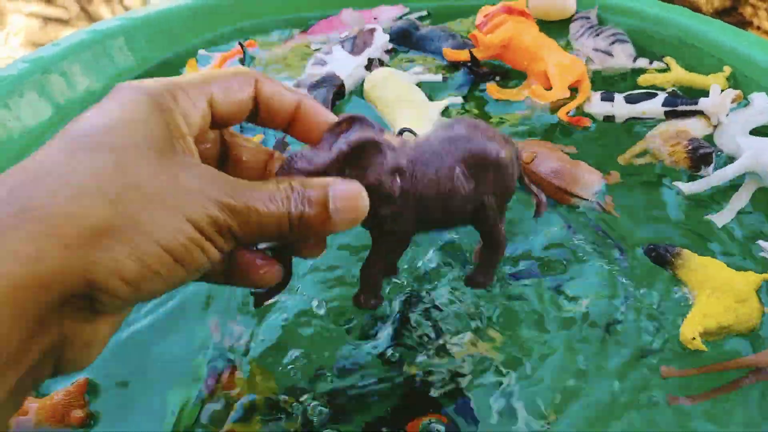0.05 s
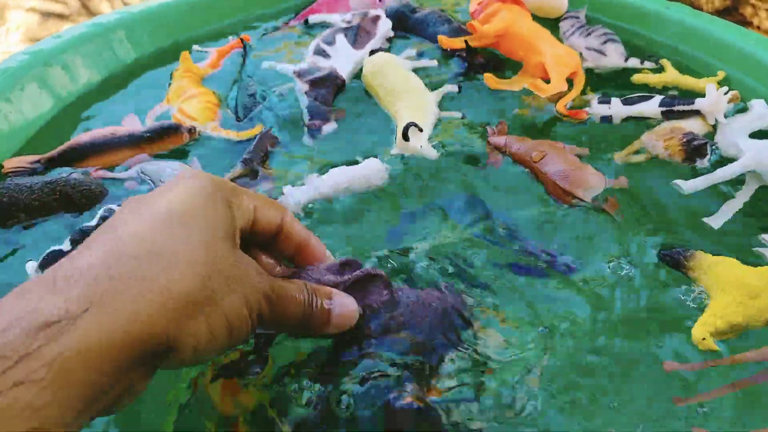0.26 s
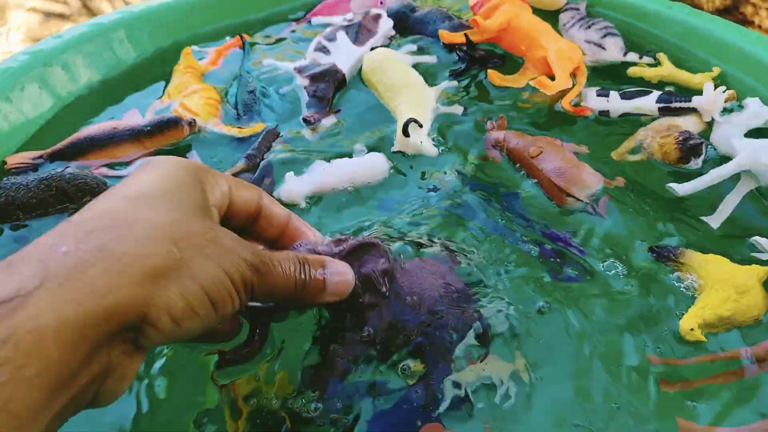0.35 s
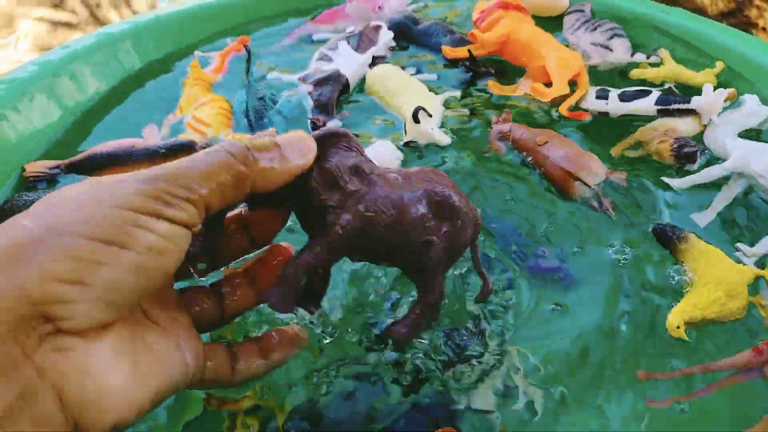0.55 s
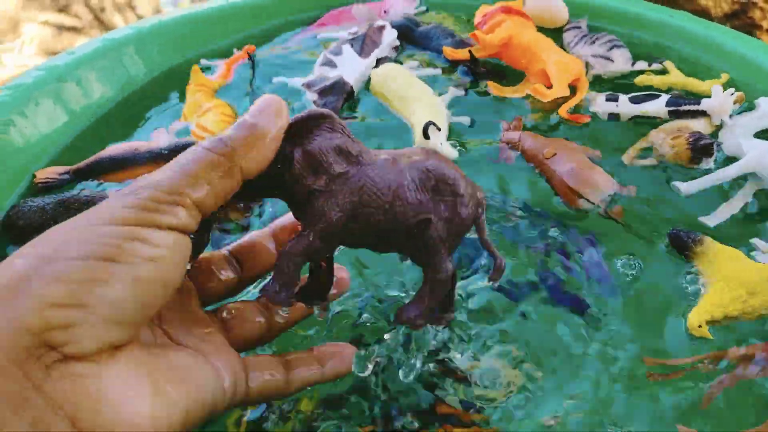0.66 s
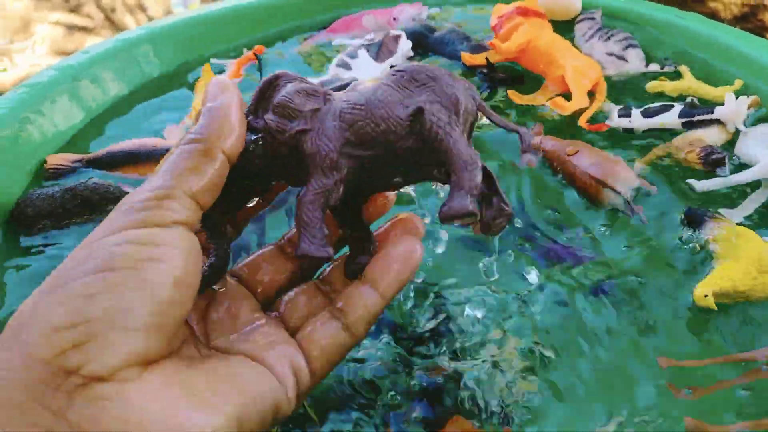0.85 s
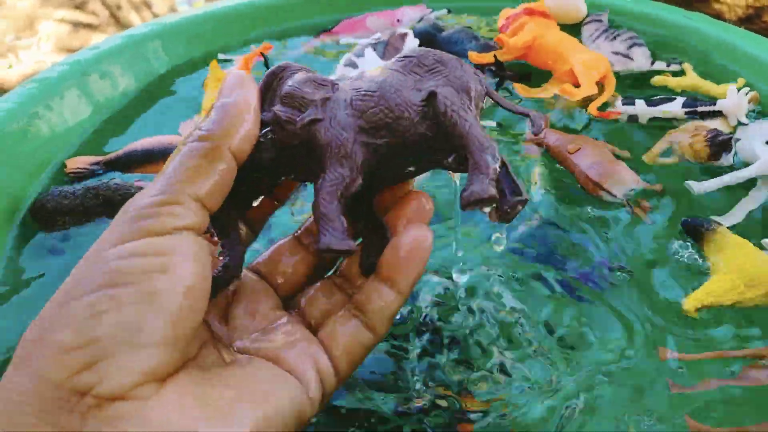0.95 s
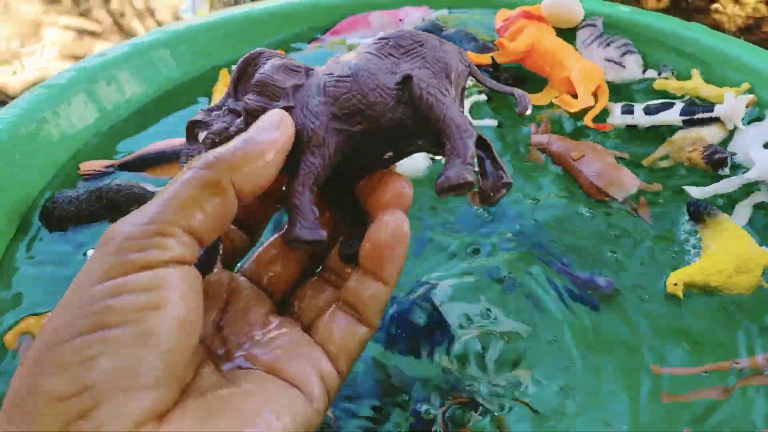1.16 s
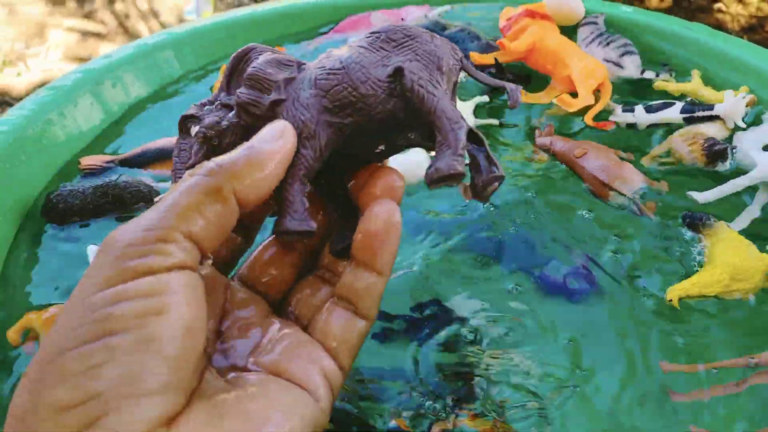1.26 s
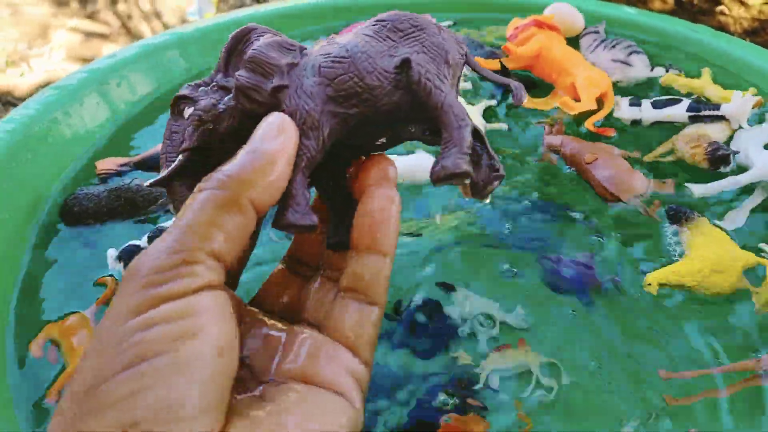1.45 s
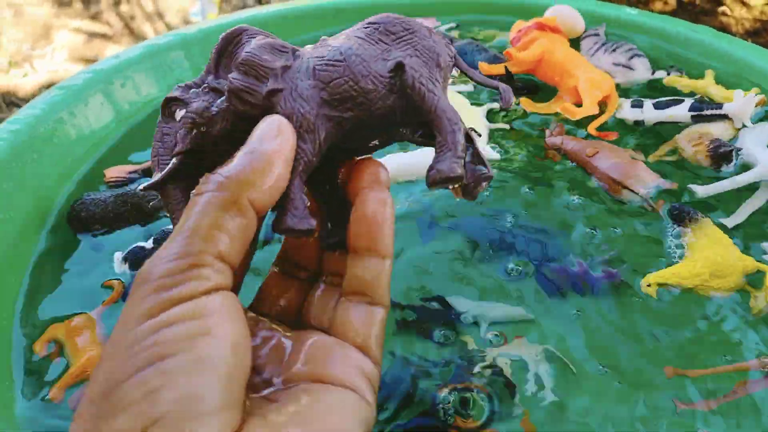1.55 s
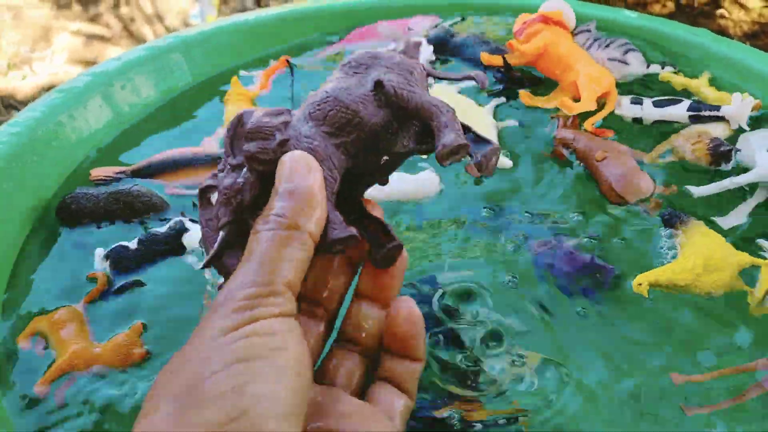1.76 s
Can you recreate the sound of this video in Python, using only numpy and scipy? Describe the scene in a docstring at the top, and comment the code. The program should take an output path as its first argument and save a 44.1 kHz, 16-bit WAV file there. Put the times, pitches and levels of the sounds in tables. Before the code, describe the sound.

A quick wet slap and bubbling splash, heard close and fairly dry, after a little trickling; then single drops tick and plink into the tub over very faint garden air and low hum.

```python
"""A plastic toy is dunked by hand in a shallow outdoor tub and lifted out, heard close: water slaps shut over it.
Slaps, film spits and mist are coloured noise bursts; bubbles, plinks and ticks are damped sines that slide in pitch.
Slosh and spray are dense random bubbles over hiss. The tub adds a short echo of decaying noise.
Behind: faint held tones, a wash of garden air (filtered noise) and a wavering low hum (sine)."""
import sys
import numpy as np
from scipy import signal
from scipy.fft import rfft, irfft, next_fast_len
from scipy.io import wavfile
from scipy.ndimage import map_coordinates

SR = 44100
rng = np.random.default_rng(int(sys.argv[2]) if len(sys.argv) > 2 else 0)


def field_ratio(decibels):
    """Amplitude ratio for a level in dB (20 dB per decade); scalars and array-likes work."""
    return 10 ** (np.asarray(decibels, dtype=float) / 20)


def master_out(mix):
    """Clip the mix to full scale and print it as 16-bit PCM to the path in sys.argv[1]."""
    frames = np.transpose(np.atleast_2d(mix))
    ceiling = np.clip(frames, -1, 1)
    pcm = np.round(ceiling * 32767).astype(np.int16)
    wavfile.write(sys.argv[1], SR, pcm)


N = 79380


def unit(x):
    """Scale to rms 1."""
    return x / np.sqrt(np.mean(x ** 2) + 1e-20)


def curve(rows):
    """Interpolate (time_s, value) rows to one value per sample."""
    return np.interp(np.arange(N) / SR, *np.transpose(rows))


def coloured(x, points):
    """Filter x causally (minimum phase) to the gain of (freq_hz, gain_db) points."""
    size = 2 * next_fast_len(N // 2 + 4096)
    freq_hz, gain_db = np.transpose(points)
    log_freq = np.log(np.fft.rfftfreq(size, 1 / SR) + 1)
    log_gain = np.interp(log_freq, np.log(freq_hz), np.maximum(gain_db, -70)) * np.log(10) / 20
    # fold the cepstrum onto positive time
    cepstrum = irfft(log_gain, size)
    cepstrum[1:size // 2] *= 2
    cepstrum[size // 2 + 1:] = 0
    return irfft(rfft(x, size) * np.exp(rfft(cepstrum)), size)[:N]


def place(start_s, shapes):
    """Sum the rows of shapes, each from its start."""
    first = np.round(np.asarray(start_s) * SR).astype(int)
    at = first[:, None] + np.arange(shapes.shape[1])
    return np.bincount(at.ravel(), shapes.ravel(), N + SR)[:N]


RISE_S = 0.013


def ring(start_s, level_db, pitch_hz, t60_s, rise, life_s, bend=1, *, attack_s, size):
    """Damped bubble tones: pitch shifts by the share rise at RISE_S; the burst takes 40 dB at life_s."""
    t = np.arange(size) / SR

    def column(v):
        return np.broadcast_to(v, np.shape(start_s))[:, None]

    # integral of pitch_hz * (1 + rise * (t / RISE_S) ** bend)
    slide = column(rise) * (t / RISE_S) ** column(bend) / (1 + column(bend))
    cycles = column(pitch_hz) * t * (1 + slide)
    fade = field_ratio(column(level_db) - 60 * t / np.maximum(column(t60_s), 0.001))
    attack = 1 - np.exp(-t / attack_s)
    burst = field_ratio(-40 * (t / column(life_s)) ** 6)
    return place(start_s, fade * attack * burst * np.sin(2 * np.pi * cycles))


def bursts(start_s, level_db, t60_s, colour):
    """Short decaying noise bursts of one colour."""
    t = np.arange(700) / SR
    noise = rng.standard_normal((len(start_s), len(t)))
    fade = field_ratio(level_db[:, None] - 60 * t / t60_s)
    return coloured(place(start_s, noise * fade), colour)


def grains(colour, pitch, spread, cycles, life_s, scatter_db, hiss_db, count):
    """Random small bubbles around a pitch, each fading 60 dB in cycles, over hiss; rms 1."""
    draw = rng.random((count, 2))
    start_s = draw[:, 0] * N / SR
    centre_hz = np.interp(start_s, *np.transpose(pitch))
    pitch_hz = np.clip(centre_hz * np.exp(spread * rng.standard_normal(count)), 400, 15500)
    level_db = scatter_db * np.minimum(-np.log(1 - draw[:, 1]), 3)
    rings = ring(start_s, level_db, pitch_hz, cycles / pitch_hz, 0.12, life_s, attack_s=0.000093, size=800)
    hiss = field_ratio(hiss_db) * rng.standard_normal(N)
    return unit(coloured(unit(rings) + hiss, colour))


# rms level of the sloshing: time_s, level_db
SLOSH_LEVEL = [(0, -54), (.16, -60), (.175, -58), (.225, -56), (.24, -29), (.275, -51), (.32, -64),
               (.39, -60), (.43, -74), (.95, -76), (1.14, -73.5), (1.36, -83.5), (1.8, -85)]
# spectrum of the sloshing: freq_hz, gain_db
SLOSH_SPECTRUM = [(400, -27), (900, -11.5), (1300, -10), (1430, -2), (1600, -7), (2400, -3.5), (3500, -7),
                  (6000, -39)]
# bubbles get smaller once the toy is out: time_s, pitch_hz
SLOSH_BUBBLE_PITCH = [(.36, 1572), (.45, 2333)]


def slosh():
    """Bubble cloud whose level follows how stirred the surface is."""
    cloud = grains(SLOSH_SPECTRUM, SLOSH_BUBBLE_PITCH, 0.35, 59, 0.03, scatter_db=4, hiss_db=-6, count=1100)
    return field_ratio(curve(SLOSH_LEVEL)) * cloud


# rms level of the fine spray: time_s, level_db
SPRAY_LEVEL = [(0, -64.5), (.13, -72), (.163, -68.5), (.172, -53), (.215, -56.5), (.24, -39), (.29, -66),
               (.32, -66), (.345, -58), (.42, -79.5), (.47, -78), (.75, -66.5), (.9, -73.5), (.94, -79),
               (1.14, -73), (1.25, -92.5), (1.44, -71.5), (1.6, -94), (1.8, -83)]
# spectrum of the fine spray: freq_hz, gain_db
SPRAY_SPECTRUM = [(4000, -15), (6000, -4.5), (7300, -2.5), (8300, -5), (9500, -34), (12000, -32),
                  (15300, -20), (16500, -27.5)]


def spray():
    """Cloud of tiny bubbles around 7 kHz whose level follows the stirred surface."""
    cloud = grains(SPRAY_SPECTRUM, [(0, 7000)], 0.35, 18, 0.0037, scatter_db=4, hiss_db=-9, count=2000)
    return field_ratio(curve(SPRAY_LEVEL)) * cloud


# spectrum of the outdoor wash: freq_hz, gain_db
AIR_SPECTRUM = [(30, -23.5), (100, 4), (300, 2), (600, -5), (780, 1.5), (1300, -9), (2500, -15),
                (4400, -24.5), (16500, -38.5)]
AIR_RMS_DB = -78.5


def air():
    """Distant outdoor wash: steady filtered noise."""
    return field_ratio(AIR_RMS_DB) * unit(coloured(rng.standard_normal(N), AIR_SPECTRUM))


HUM_HZ, HUM_DB = 103.7, -82  # centres of the drift


def hum():
    """Low sine whose level and pitch waver slowly at random."""
    knots = np.linspace(1, 22, N)
    drift = map_coordinates(rng.standard_normal((2, 24)), [[np.zeros(N), np.ones(N)], [knots, knots]])
    level_db = HUM_DB + 1.5 * drift[0]
    pitch_hz = HUM_HZ + 2 * drift[1]
    return field_ratio(level_db) * np.sin(2 * np.pi * np.cumsum(pitch_hz) / SR)


# tones in the trickle and faintly in the distance: start_s, level_db, pitch_hz, life_s
HELD_TONES = [(.005, -54, 1433, 0.067), (0.093, -51, 957, 0.021), (0.112, -52, 1388, 0.038),
              (0.175, -46, 1423, 0.028), (0.397, -70.5, 591, 0.078), (0.444, -56, 2356, 0.013),
              (1.372, -74.5, 2340, 0.05), (1.533, -72, 1857, 0.055), (1.6, -77, 1560, .1)]
HELD_T60_S, HELD_RISE = 0.6, -0.0051


def faint_tones():
    """Slowly damped tones that sag a little in pitch."""
    start_s, level_db, pitch_hz, life_s = np.transpose(HELD_TONES)
    return ring(start_s, level_db, pitch_hz, HELD_T60_S, HELD_RISE, life_s, attack_s=0.008, size=6000)


# short bubbles: start_s, level_db (before boost), pitch_hz
SHORT_BUBBLES = [(0.0054, -43, 2262), (0.015, -44.5, 2840), (.0255, -40.5, 2100), (0.0603, -38.5, 3400),
                 (0.097, -43.5, 2720), (.212, -35.5, 1590), (0.1695, -39, 2330), (0.186, -44.5, 1458),
                 (0.188, -33.5, 2850), (0.232, -17.5, 2490), (0.2376, -17, 3940), (0.2421, -17, 2370),
                 (0.25, -30.5, 2520), (.271, -25.5, 1610), (0.2865, -36, 1313), (.295, -34, 1500),
                 (0.309, -32, 1520), (0.3467, -40, 1660), (0.5317, -53, 2100), (0.534, -54, 3080),
                 (0.5795, -47, 1624), (0.6842, -47, 2300), (0.7046, -50, 1480), (0.7622, -41.5, 3500),
                 (0.856, -44.5, 1407), (.857, -47, 4150), (0.9928, -53.5, 1480), (1.0643, -44, 2510),
                 (1.112, -41.5, 1806), (1.132, -38, 3720), (1.1531, -48, 2540), (1.2301, -51.5, 2440),
                 (1.2778, -54, 1444), (1.3238, -59, 2980), (1.405, -40, 4480), (1.4459, -48, 3720)]
BUBBLE_CYCLES, BUBBLE_BOOST_DB = 29.3, 3.5  # cycles to fade by 60 dB


def short_bubbles():
    """Bubbles that climb in pitch near the surface and burst within milliseconds."""
    start_s, level_db, pitch_hz = np.transpose(SHORT_BUBBLES)
    return ring(start_s, level_db + BUBBLE_BOOST_DB, pitch_hz, BUBBLE_CYCLES / pitch_hz, 0.08, 0.0046,
                attack_s=0.0003, size=1600)


# thin treble spits: start_s, level_db (before boost)
FILM_SPITS = [(0.0363, -49), (0.2309, -39.5), (0.2708, -44.5), (0.2942, -43), (0.633, -55.5), (.8779, -61),
              (1.0301, -62.5), (1.2067, -52), (1.4032, -54), (1.6931, -50)]
# spectrum of a spit: freq_hz, gain_db
SPIT_SPECTRUM = [(8500, -22.5), (10000, -22), (12000, 7), (13500, -2.5), (15300, 2), (16500, -15.5)]
SPIT_T60_S, SPIT_BOOST_DB, MIST_DB = 0.008, 2.5, -12  # mist: relative to spray, before boost


def spits():
    """Bursting thin films: listed spits plus random mist, loudest where the spray is strong."""
    spit_s, spit_db = np.transpose(FILM_SPITS)
    draw = rng.random((160, 2))
    mist_s = draw[:, 0] * N / SR
    scatter_db = -5 * np.log(1 - draw[:, 1])
    mist_db = np.interp(mist_s, *np.transpose(SPRAY_LEVEL)) + MIST_DB + scatter_db
    start_s, level_db = np.append(spit_s, mist_s), np.append(spit_db, mist_db)
    return bursts(start_s, level_db + SPIT_BOOST_DB, SPIT_T60_S, SPIT_SPECTRUM)


# tiny bubbles of fine drops: start_s, level_db (before boost), pitch_hz
DROP_TICKS = [(0.0176, -31.5, 7300), (0.07, -22.5, 6340), (0.0938, -39, 6880), (0.185, -32.5, 6500),
              (0.2374, -20, 5140), (0.271, -4.5, 7124), (.27, -11.5, 5750), (.2701, -16, 4860),
              (.2702, -17.5, 3920), (0.2753, -21, 6370), (0.3662, -43, 7300), (0.4653, -44, 6990),
              (0.4819, -46, 7060), (0.5803, -36.5, 5900), (0.634, -36.5, 7030), (0.6546, -33.5, 7380),
              (0.7097, -45, 5100), (0.7473, -38, 5970), (0.8569, -44, 6200), (0.8743, -40.5, 7440),
              (1.0308, -39.5, 8300), (1.0724, -38, 6800), (1.1095, -30, 6980), (1.1516, -38.5, 7340),
              (1.2105, -39.5, 7540), (1.268, -49, 6860), (1.444, -40.5, 5940), (1.502, -47, 6400),
              (1.5408, -36.5, 7290), (1.6647, -29.5, 6010), (1.6901, -34.5, 5740), (1.6936, -31, 7600),
              (1.7878, -49.5, 6760)]
TICK_CYCLES, TICK_BOOST_DB = 48, 4.5  # cycles to fade by 60 dB


def ticks():
    """Tiny high bubbles, cut short by their burst."""
    start_s, level_db, pitch_hz = np.transpose(DROP_TICKS)
    return ring(start_s, level_db + TICK_BOOST_DB, pitch_hz, TICK_CYCLES / pitch_hz, 0.064, 0.0028,
                attack_s=0.00083, size=700)


# clear ringing bubbles: drop plinks, and two low, longer air-pocket tones after the plunge (0.289, 0.338 s):
# start_s, level_db, pitch_hz (at start), t60_s, rise (pitch share at RISE_S), life_s, bend (lateness of the rise)
CLEAR_BUBBLES = [(0.058, -36, 1600, 0.032, -0.077, 0.017, 0.87), (.289, -48.5, 777.5, .2, .002, 0.054, 1),
                 (.338, -62, 940, .8, .035, .054, 1.2), (.8787, -22, 2610, 0.01, -0.27, 0.015, 0.52),
                 (.8911, -24, 2216, .042, .08, .022, 3), (1.0725, -29, 1416, 0.084, .11, 0.048, 1.12),
                 (1.1103, -29.5, 2400, 0.047, 0.26, 0.025, 1.7),
                 (1.1329, -44, 2200, 0.04, 0.15, 0.018, 1.3)]


def plinks_and_low_pockets():
    """Clear ringing bubbles, most gliding up in pitch, some down."""
    return ring(*np.transpose(CLEAR_BUBBLES), attack_s=0.00055, size=5000)


# sharp surface smacks: start_s, level_db (before boost)
SURFACE_SMACKS = [(.0585, -30), (.193, -20.5), (.2222, -21), (.231, -6), (.2372, -8), (.2502, -25),
                  (.2595, -20.5), (.2706, -6), (.2718, -10.5), (.2875, -28.5), (.2953, -26), (.579, -36.5),
                  (.76, -31.5), (.8784, -32), (.8908, -21.5), (.9916, -36.5), (1.0636, -43),
                  (1.1102, -22.5), (1.1316, -34.5), (1.152, -41), (1.253, -46), (1.326, -44)]
# spectrum of a smack: freq_hz, gain_db
SMACK_SPECTRUM = [(300, -34), (671, -28.5), (2000, -15), (2440, -5.5), (3300, -15), (7260, -10.5),
                  (8870, -38.5), (15400, -46.5), (16500, -50.5)]
SMACK_BOOST_DB, SMACK_T60_S = 4, 0.0085


def smacks():
    """Surface broken or slapped shut: sharp noise bursts."""
    start_s, level_db = np.transpose(SURFACE_SMACKS)
    return bursts(start_s, level_db + SMACK_BOOST_DB, SMACK_T60_S, SMACK_SPECTRUM)


# large air pockets dragged under by the plunge: start_s, level_db, pitch_hz, t60_s
AIR_POCKETS = [(.236, -20.5, 1065, 0.024), (.241, -40.5, 387, 0.054), (.243, -24.5, 692, 0.048),
               (.2515, -23.5, 883, 0.054)]


def pockets():
    """Big bubbles: low, quickly damped tones with a slight pitch rise."""
    return ring(*np.transpose(AIR_POCKETS), 0.02, 0.06, attack_s=0.0015, size=3200)


TUB_DB, TUB_T60_S = -16, 0.022


def tub(wet):
    """Answer of tub wall and ground: convolution with a unit-energy noise tail from 1 ms on."""
    t = np.arange(SR // 10) / SR
    tail = rng.standard_normal(len(t)) * field_ratio(-60 * t / TUB_T60_S) * (t > 0.001)
    return field_ratio(TUB_DB) * signal.fftconvolve(wet, tail / np.linalg.norm(tail))[:N]


def scene():
    """Water with its tub echo, over air, hum and dry held tones; one channel."""
    water = slosh() + spray()
    water += short_bubbles() + spits() + ticks() + plinks_and_low_pockets() + smacks() + pockets()
    return (water + tub(water) + air() + hum() + faint_tones())[None]


def low_pass(x):
    """Removes everything above the highest recorded frequency."""
    return signal.sosfilt(signal.butter(12, 17000, fs=SR, output="sos"), x)


TOP_HZ = 16700


def record(dry):
    """Band-limit the mix with a brick wall at TOP_HZ."""
    size = next_fast_len(N + 4096)
    passband = np.fft.rfftfreq(size, 1 / SR) < TOP_HZ
    mix = irfft(rfft(dry, size) * passband, size)[:, :N]
    return low_pass(mix)


dry = scene()
out = record(dry)
master_out(out)
```